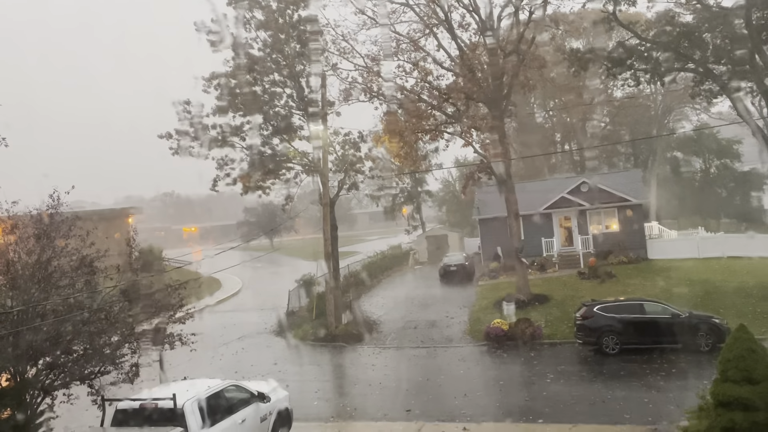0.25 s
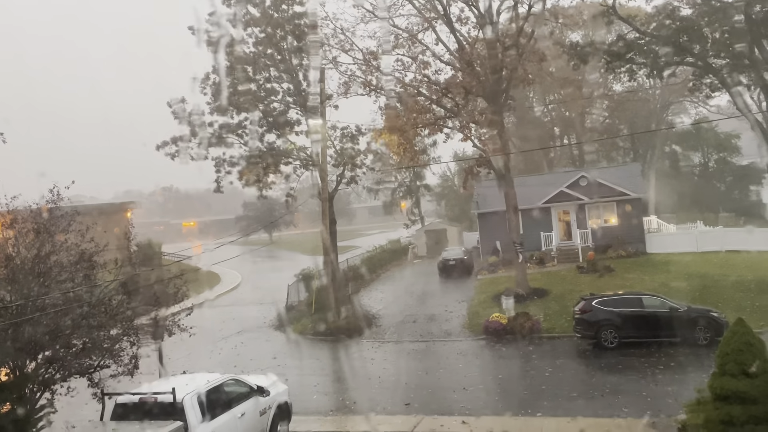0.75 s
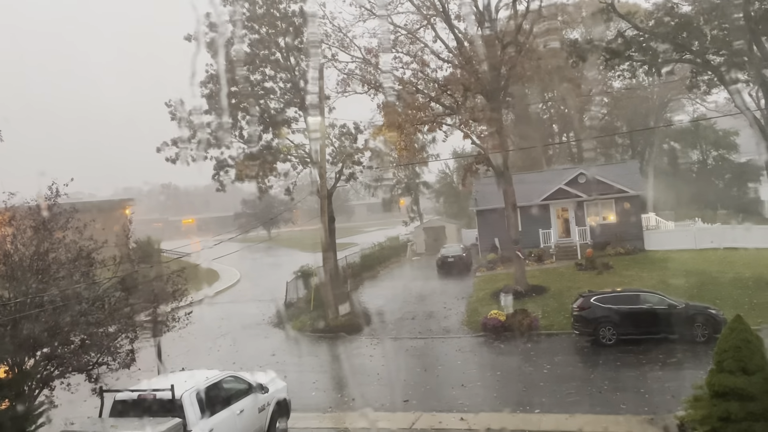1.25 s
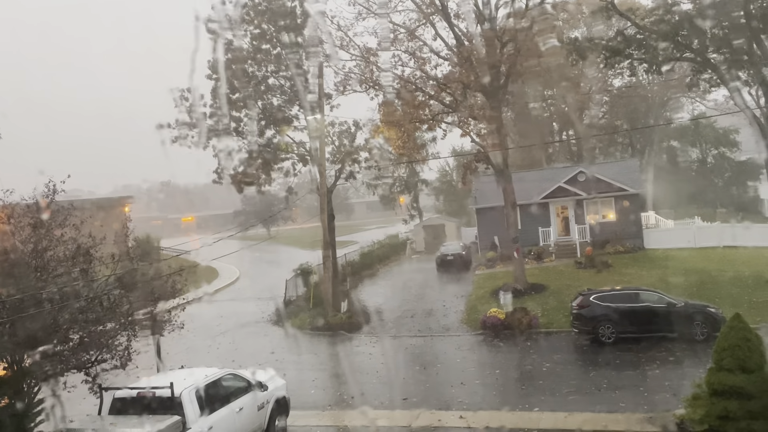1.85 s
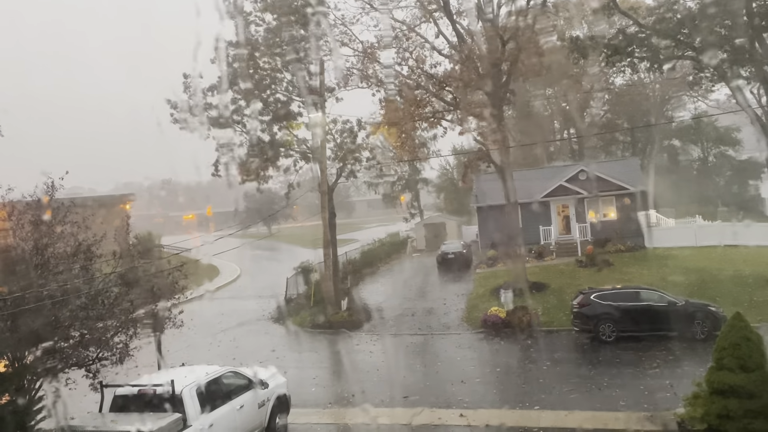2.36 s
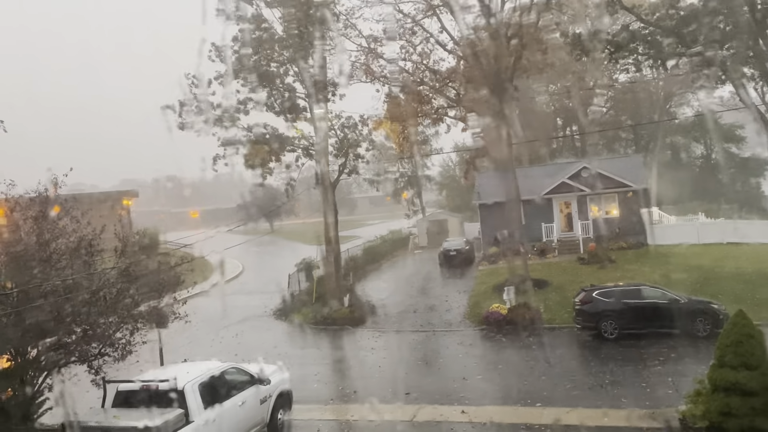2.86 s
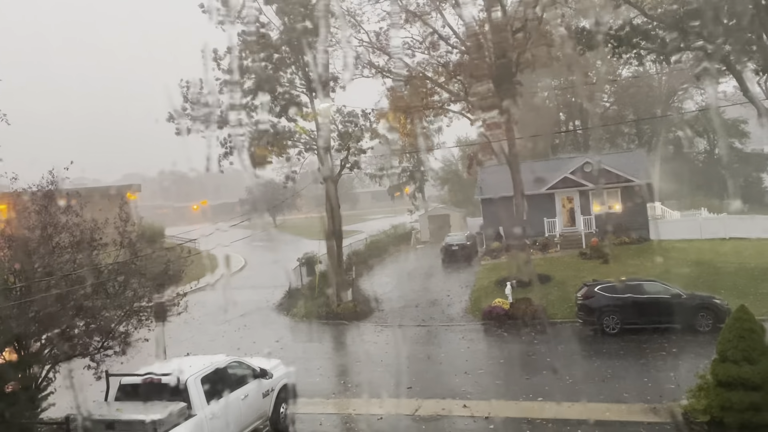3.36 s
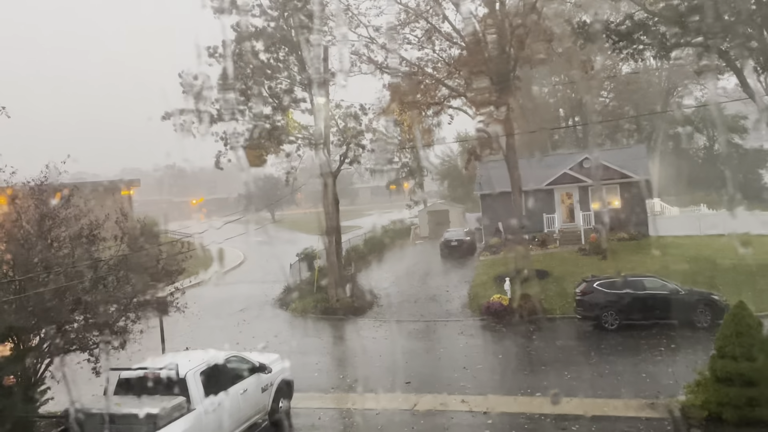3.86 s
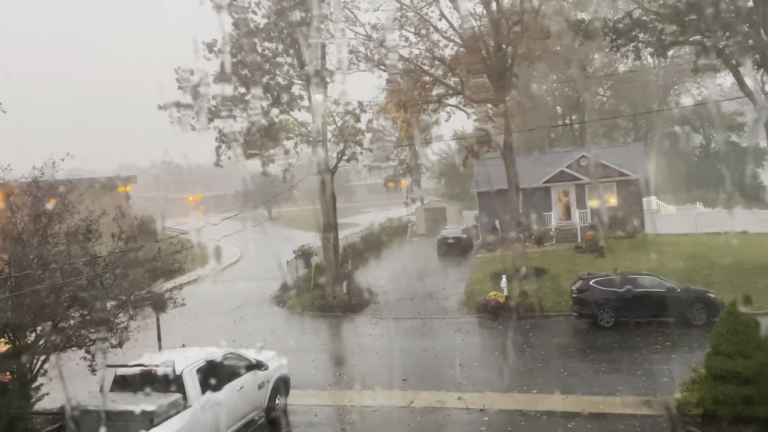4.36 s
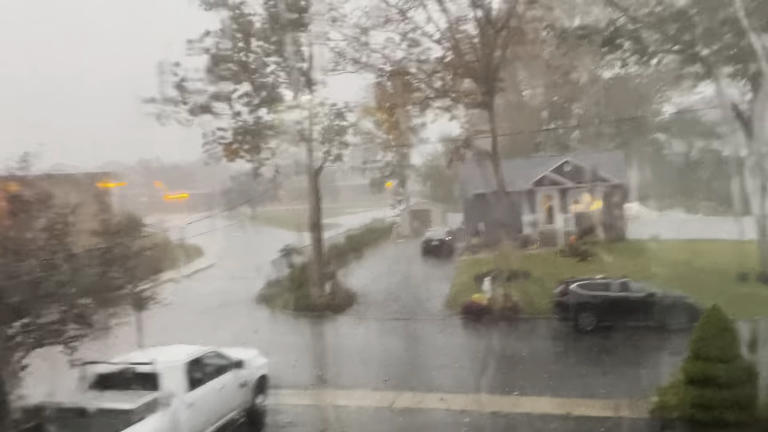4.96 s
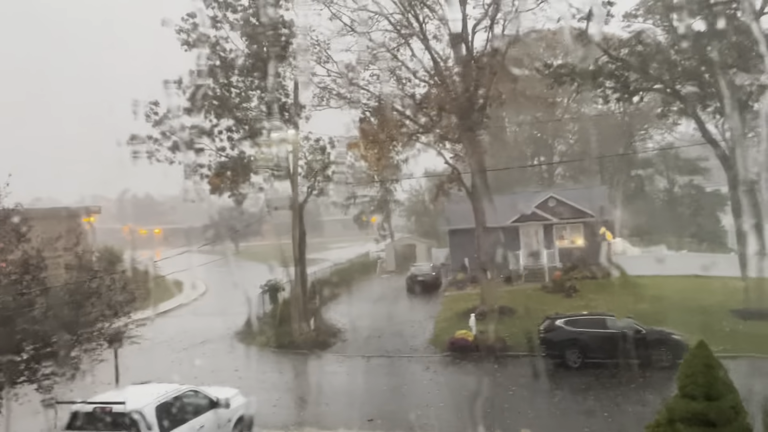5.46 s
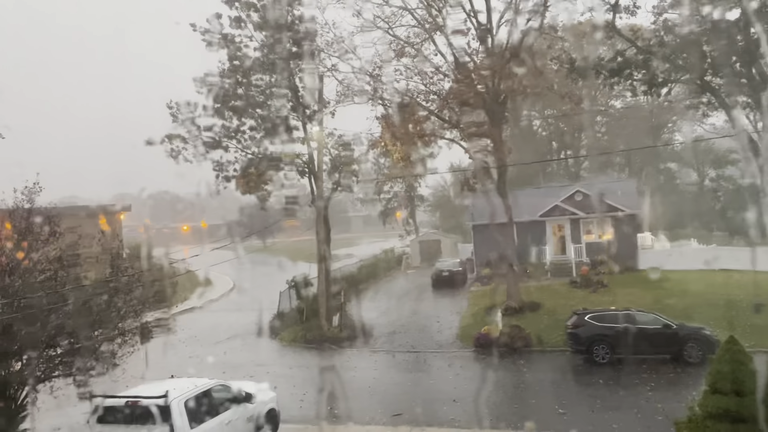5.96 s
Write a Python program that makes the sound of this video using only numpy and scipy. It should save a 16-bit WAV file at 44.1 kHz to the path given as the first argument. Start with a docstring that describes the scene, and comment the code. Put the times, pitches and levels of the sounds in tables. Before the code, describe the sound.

About six seconds of storm heard from inside a small furnished room, microphones close to a closed window. From the start there is a dull, muffled wash of rain, low drumming on roof and walls, and a deep uneven wind rumble. Fine patter and soft taps on sill and frame run throughout. Large drops strike the glass irregularly, with bright cracks around 0.5 s and the hardest at about 0.8-0.9 s, then a busy cluster at 1.05-1.4 s; each has a tick, small thud, short glassy ring and spatter. From 1.5 to 3 s hits are moderate and more scattered, then increasingly sparse and soft after 3.5 s. A low window hum swells around 1 s; a higher hum rises around 4.4-4.8 s. Wind bumps the pane faintly near 0.7, 1, 2.8 and 3.2 s, and strongly at 4.5-4.6 s. The end is mostly wind, thin patter and fading rain.

```python
"""Heavy drops, flung by gusts, hit a window close by: each one cracks, thuds, rings in the pane and spatters.
Light drops, fine spray and taps on the sill patter between them as the squall eases.
Behind them the downpour is a dull wash and a drumming on the roof; wind rumbles and makes the window hum.
Hits are short bursts of coloured noise, ringing is noise shaped by the pane's pitches, and rain and wind
are steady noise whose colour and changing strength come from tables."""
import sys
import numpy as np
from scipy import signal
from scipy.fft import rfft, irfft, next_fast_len
from scipy.io import wavfile
from scipy.ndimage import uniform_filter1d

SR = 44100
rng = np.random.default_rng(int(sys.argv[2]) if len(sys.argv) > 2 else 0)


def generate_wav(sig):
    """Save sig (samples, or channels by samples) to the path in sys.argv[1] as 16-bit PCM at SR."""
    pcm = np.round(np.clip(np.atleast_2d(sig).T, -1, 1) * 32767).astype(np.int16)
    wavfile.write(sys.argv[1], SR, pcm)


N = 273420  # length in samples

# Heavy drops on the glass: t/s, level/dB, thud against tick/dB, splash against tick/dB,
# ring of the struck spot f/Hz, pitch of the thud f/Hz; drop() trims the thud and splash further
HEAVY_DROPS = [(0.006, -52.5, 3.5, -10.5, 3940, 1100), (0.104, -60, 3, -5, 3780, 740),
               (0.324, -51, -1, -6.5, 2960, 600), (0.434, -49.5, -3, -6, 2200, 740),
               (0.465, -46, -4, -5, 2440, 1430), (0.4922, -34.5, -12, 0, 6300, 1100),
               (0.4973, -38.5, -11, -22, 3970, 1110), (0.528, -46.5, 5.5, -18, 3670, 860),
               (0.5849, -41, -16, -10, 3800, 680), (0.5926, -54, 8, -6, 3700, 710),
               (0.634, -64.0, 0.0, 5, 4310, 1040), (0.659, -55.5, 10.5, -11, 2330, 1174),
               (0.7268, -49.5, 4.0, -10.0, 3900, 830), (0.7534, -52, -2, -3, 2330, 670),
               (0.783, -35.0, -4.5, -7, 3470, 870), (0.802, -46.5, 3.5, -7, 5100, 784),
               (0.857, -30.5, -7.5, -4, 5900, 1140), (0.8614, -35.5, -12, -21, 3800, 1440),
               (0.867, -41, -11, -20, 3600, 1440), (0.9877, -54, -2, -8, 3700, 820),
               (1.052, -42, -20, -13, 5040, 690), (1.0783, -42, -6, -8.0, 2420, 1200),
               (1.1211, -44.0, -4, -9, 3500, 880), (1.139, -37, 4, -10, 2240, 1100),
               (1.146, -44, 5.5, -9, 2300, 1140), (1.1556, -44.5, -1, -8.0, 3480, 786),
               (1.169, -46, 4, -2, 3890, 750), (1.198, -50.0, 4, -10, 2400, 840),
               (1.2999, -55, -1, -10, 3700, 1230), (1.3207, -46, -11.0, -6.0, 2300, 760),
               (1.3603, -41.5, -11, -7, 3780, 750), (1.3734, -47.5, -18.0, -1.5, 3770, 1170),
               (1.404, -55.5, -8.0, 3.0, 2520, 740), (1.4903, -43.5, -18.0, 0.5, 3850, 600),
               (1.579, -45, -3, -7.0, 3800, 850), (1.6149, -61, -13, 1, 3590, 740),
               (1.688, -64.5, 13, 6, 2350, 880), (1.7302, -50.5, -0.5, -1, 3750, 780),
               (1.7627, -51.5, -8.0, -8.0, 3740, 780), (1.812, -50, 5.5, -2, 2210, 645),
               (1.881, -52.5, -6, -3, 4370, 780), (1.905, -55, -1, -15, 2400, 870),
               (1.923, -43.5, -4.5, -13, 3740, 830), (2.02, -51.5, 4, -15.0, 2100, 1440),
               (2.0564, -61, 7.5, -10, 2120, 880), (2.0937, -42.0, -12, -2, 3800, 990),
               (2.155, -65, -9.0, 10, 2200, 1440), (2.218, -45.5, -15.0, 0.5, 3840, 760),
               (2.339, -54, 3, 7, 4820, 1060), (2.3505, -42, 4.5, -7, 4100, 1110),
               (2.405, -46, -8, -7, 3900, 1090), (2.4232, -39.0, -9.0, -19, 3880, 1010),
               (2.428, -45, -4, -27, 4500, 870), (2.513, -46.5, -5, -5, 3800, 750),
               (2.562, -49, -4, -16.0, 2590, 1170), (2.661, -58.5, 9, -4.5, 2100, 985),
               (2.711, -40, -15, -20, 2530, 1300), (2.7189, -43, -6, -21, 2400, 1290),
               (2.869, -49, 5, -5.5, 3620, 820), (2.9161, -52.0, 4, -7, 2270, 1130),
               (2.919, -44.0, 5, 0, 2260, 1160), (2.961, -49.5, -21.0, -8.0, 3700, 760),
               (3.02, -56.5, -4.0, -4.0, 2540, 600), (3.072, -47.5, -3, -4.5, 5400, 1080),
               (3.292, -53, -12, -33, 2460, 1390), (3.357, -53.5, -2.0, -8, 2290, 820),
               (3.41, -44.5, -12.0, -9, 3460, 1070), (3.5252, -47.5, -6.0, 3.5, 5650, 816),
               (3.705, -54.5, -2, -10.0, 3930, 780), (3.9505, -55.0, 4.5, 1.5, 2290, 780),
               (3.9714, -46, 2.5, -2.5, 2150, 1160), (4.0525, -48.5, -0.5, -5.5, 4040, 1090),
               (4.121, -60.0, -4.0, -6.0, 2310, 730), (4.22, -56.0, 2.5, -26.0, 2480, 1010),
               (4.3508, -62, -19, -3, 2520, 600), (4.374, -58.0, -16.0, -2.0, 2900, 760),
               (4.443, -54.5, -19, -0.5, 2260, 600), (4.638, -58.0, 3, -21, 2200, 790),
               (4.712, -52.5, -6, -10, 3670, 1240), (4.861, -51, 3, -32, 3870, 1260),
               (5.058, -68, 13, -18, 2300, 790), (5.562, -56.5, 1, -16, 2800, 700)]
# Wind slapping the window: t/s, peak level of the ring/dB
WIND_SLAPS = [(0.717, -39), (0.966, -41), (2.79, -48), (3.245, -41), (4.513, -34.5), (4.587, -28)]
# Wind in two long gusts, the first in the lower hum, the second in the upper; levels before trim and wavering:
# t/s, rumble level/dB, lower hum level/dB, upper hum level/dB
WIND_STRENGTH = [(0, -41.5, -45, -54), (0.4, -45, -41, -50), (1.15, -43.5, -39, -47.5),
                 (1.6, -45, -44.5, -49.5), (2.1, -48.5, -54, -56), (2.45, -47.5, -52.5, -55),
                 (2.8, -43.5, -42, -51), (3.0, -47, -52.5, -49.5), (3.3, -41.5, -47.5, -49),
                 (3.75, -45, -51.5, -52), (4.05, -43.5, -44, -45.5), (4.4, -45, -53, -42),
                 (4.75, -46.5, -53, -43), (5.25, -43.5, -44, -49), (5.7, -47, -49, -52.5),
                 (6.2, -46.5, -47.5, -58.5)]
# Rain strength, one squall that slowly eases: t/s, level/dB (the wash is trimmed from this)
RAIN_STRENGTH = [(0.0, -51.5), (0.4, -53.5), (0.7, -51.5), (0.88, -47.5), (1.2, -49), (1.97, -52),
                 (2.17, -56.5), (2.62, -53), (3.66, -55.5), (4.54, -55), (5.01, -56.5), (5.44, -55),
                 (6.2, -58.5)]
# Pitches at which the pane bends and rings: f/Hz, level/dB (before each drop's own balance)
PANE_MODES = [(728, 0), (865, -2), (1068, 0), (1180, -1), (1594, -4), (2330, -4), (2440, 0), (2560, -3),
              (2804, -4), (3340, -4), (3638, -1), (3775, 0), (4010, -4), (4230, -3), (4487, 0), (4721, -2),
              (4867, -2), (5145, -3), (5620, -4), (6600, 0)]
# Low resonances of the room: f/Hz, width f/Hz, level/dB
ROOM_BOOM = [(70, 40, 4), (186, 18, 7.5), (198, 38, -3), (324.2, 10.3, 7)]
# Window resonances that hum in the gusts, lower and upper group: f/Hz, width f/Hz, level/dB
LOWER_WINDOW_HUMS = [(143.9, 21.7, 0)]
UPPER_WINDOW_HUMS = [(227.3, 12, 0), (307.3, 11.3, -6), (390.4, 13, -17), (446.6, 8.8, -19)]

# Sound colours, of which only the shape counts: f/Hz, level/dB
# wind rumble
RUMBLE_COLOUR = [(12, -29), (25, -16), (40, -12), (60, -3), (100, -3.5), (160, -3.5), (250, -8),
                 (330, -12.5), (460, -20.5), (600, -31), (1000, -35), (3000, -71.5)]
# rain outside, dulled by the window
WASH_COLOUR = [(250, -18), (450, 4.5), (600, 4.5), (780, 4.5), (1100, -2), (1500, -5.5), (2400, -6),
               (3600, -9.5), (5500, -15.5), (7200, -19), (10000, -21.5), (13000, -37), (15000, -47),
               (16000, -55)]
# rain drumming on the roof and walls
DRUM_COLOUR = [(200, -26.5), (330, -0.5), (390, -1), (490, 0), (570, -16), (900, -32.5), (2000, -56.5)]
# fine drops on the glass
PATTER_COLOUR = [(500, -19), (1500, -5.5), (2500, 0), (3900, -1), (5200, -11.5), (7800, -27), (9200, -25),
                 (10000, -32), (12500, -28), (14000, -25), (15000, -40), (16200, -46)]
# soft drops on sill and frame
TAP_COLOUR = [(300, -8), (700, 1.5), (1300, -0.5), (2500, -5.5), (4500, -9.5), (8000, -28)]
# the three parts of a drop's blow
THUD_COLOUR = [(250, -29), (500, -4.5), (750, 7), (1150, 3), (1700, -2.5), (2300, -2.5), (4000, -59.5)]
TICK_COLOUR = [(900, -2.5), (1600, 0.5), (2200, 6), (3900, 5.5), (5200, 4), (6700, -5), (7800, -3.5),
               (9000, -13), (11000, -49)]
SPLASH_COLOUR = [(4000, -58), (6500, 4), (7900, 3.5), (9200, 2.5), (10000, 0), (12500, -7.5), (14000, -1.5),
                 (15500, -8), (16300, -17)]

# Stereo width, the difference between the ears against what they share: f/Hz, level/dB
STEREO_WIDTH = [(50, -18.5), (125, -18), (250, -12), (500, -3.5), (1000, -3.5), (2000, -1.5), (4000, -7),
                (5500, -4.5), (8000, -19), (14000, -19)]
# How far the left microphone lags the right: f/Hz, phase/radians
LEFT_LAG = [(0, 0), (5800, 0), (6600, .9), (7750, 2.8), (8400, 3.3), (11000, 6.2), (12200, 6.4),
            (14700, 9.4), (16500, 9.4)]

USUAL_RAIN_DB = -55  # rain strength at which the patter and drumming have their plain levels


def undb(db):
    """Turn decibels into a gain."""
    return 10 ** (np.asarray(db) / 20)


def curve(table, column):
    """Join one column of a table of times with straight lines."""
    rows = np.array(table)
    return np.interp(np.arange(N) / SR, rows[:, 0], rows[:, column])


def unit(x):
    """Scale to an average (rms) level of 1, taken on the mean of the channels."""
    return x / np.sqrt(np.mean(np.atleast_2d(x).mean(0) ** 2))


def colour(x, points, peaks=()):
    """Filter by a smooth spectrum plus resonance peaks, without sounding ahead of the input."""
    size = next_fast_len(x.shape[-1] // 2 + 1024) * 2
    hz = np.maximum(np.fft.rfftfreq(size, 1 / SR), 1)
    points = np.array(points)
    db = np.interp(np.log(hz), np.log(points[:, 0]), points[:, 1])
    for centre, width, gain in peaks:
        db = db + gain / (1 + (2 * (hz - centre) / width) ** 2)
    # folding the cepstrum gives the phase that puts the energy as early as possible
    cepstrum = irfft(np.log(undb(db)))
    cepstrum[1:size // 2] *= 2
    cepstrum[size // 2 + 1:] = 0
    response = np.exp(rfft(cepstrum))
    return irfft(rfft(x, size) * response)[..., :x.shape[-1]]


def spread(pair):
    """Make stereo from two unrelated signals: alike in the bass, less alike higher up."""
    side = colour(pair[1], STEREO_WIDTH)
    return np.array([pair[0] + side, pair[0] - side])


def air(size):
    """White noise that comes from all around."""
    return spread(rng.standard_normal((2, size)))


def pan(x, left_db):
    """Lean a pair of channels to the left."""
    return x * undb(np.array([[left_db], [-left_db]]) / 2)


def walk(rate):
    """Slow random wavering of size 1, from random steps (rate in steps per second) smoothed twice."""
    k = int(SR / rate)
    steps = np.repeat(rng.standard_normal(N // k + 1), k)
    smooth = uniform_filter1d(uniform_filter1d(steps, k), k)
    return unit(smooth[:N])


def fade(t, t60):
    """Die away steadily, by 60 dB in t60 seconds."""
    return np.exp(-np.log(1000) * t / t60)


def add(out, sound, at):
    """Mix a sound in at a time in seconds."""
    i = max(int(at * SR), 0)
    out[:, i:i + sound.shape[1]] += sound[:, :max(out.shape[1] - i, 0)]


def impact(spectrum, t60, build_s, crack, crack_t60, peaks=(), ragged_db=-2.5):
    """A sharp first wave, then edge reflections and flung droplets as noise that builds up and fades."""
    t = np.arange(4096) / SR
    bumps = np.interp(t, np.linspace(0, t[-1], num=36), rng.standard_normal(size=36))
    build_up = fade(t, t60) * (1 - np.exp(-t / build_s)) * undb(ragged_db * bumps)
    envelope = build_up + crack * fade(t, crack_t60)
    noise = rng.standard_normal((2, len(t))) * envelope
    pair = colour(spread(noise), spectrum, peaks)
    head = int(.014 * SR)  # the first 14 ms get an rms level of 1
    return pair / np.sqrt(np.mean(pair[:, :head].mean(0) ** 2))


def downpour(wash_db=-1.46, waver_db=-0.42, drum_db=-3.5, drum_growth=1.13, drum_waver_db=1.65):
    """Rain on the street, dulled by the closed window, and its low drumming on roof and walls."""
    rain = curve(RAIN_STRENGTH, column=1)
    wash = unit(colour(air(N), WASH_COLOUR))
    wash = wash * undb(rain + wash_db + waver_db * walk(12))
    # drum_growth is how many dB the drumming gains per dB of rain
    drum_level = USUAL_RAIN_DB + drum_db + drum_growth * (rain - USUAL_RAIN_DB)
    drum_level = drum_level + drum_waver_db * walk(9.6)
    drumming = unit(colour(air(N), DRUM_COLOUR)) * undb(drum_level)
    return wash + pan(drumming, left_db=2.0)


def wind(rumble_db=1, gusty_db=1.0, eddy_db=1.23, hum_waver_db=2.0):
    """Turbulence rumbles through the walls and hums in the window; deep and higher eddies swell on their own."""
    rumble = unit(colour(air(N), RUMBLE_COLOUR, ROOM_BOOM))
    lowpass = signal.butter(3, 120, fs=SR, output="sos")
    deep = signal.sosfiltfilt(lowpass, rumble)
    eddies = sum(part * undb(eddy_db * walk(7)) for part in (deep, rumble - deep))
    out = eddies * undb(curve(WIND_STRENGTH, column=1) + rumble_db + gusty_db * walk(9))
    push = colour(air(N), RUMBLE_COLOUR)
    for column, hums in ((2, LOWER_WINDOW_HUMS), (3, UPPER_WINDOW_HUMS)):
        gust = curve(WIND_STRENGTH, column)
        for hz, width_hz, db in hums:
            hum = signal.lfilter(*signal.iirpeak(hz, hz / width_hz, fs=SR), push)
            out += unit(hum) * undb(gust + db + hum_waver_db * walk(7.6))
    return pan(out, left_db=0.7)


def buffets(ring_t60=0.3, ring_hz=226, rise_t60=0.036, thump_db=-7, thump_t60=0.96):
    """A slap of wind bumps the window: a low ring and a short swell of rumble."""
    out = np.zeros((2, N))
    t = np.arange(SR // 2) / SR
    push = 1 - fade(t, rise_t60)
    ring = np.sin(2 * np.pi * ring_hz * t) * fade(t, ring_t60) * push
    ring = ring / ring.max()
    for at, db in WIND_SLAPS:
        rumble = unit(colour(air(len(t)), RUMBLE_COLOUR, [(600, 650, -5)]))
        thump = rumble * fade(t, thump_t60) * push
        add(out, undb(db) * (ring + undb(thump_db) * thump), at)
    return out


def sill_taps(count=130, below_rain_db=5.5, scatter_db=3, tap_t60=0.05, spot_db=11):
    """Soft drops on sill and frame, each at one of 14 dull pitches; they thin out as the rain eases."""
    out = np.zeros((2, N))
    rain = curve(RAIN_STRENGTH, column=1)
    spots = [impact(TAP_COLOUR, t60=tap_t60, build_s=0.0014, crack=0.46, crack_t60=0.0076,
                    peaks=[(hz, hz / 5, spot_db)])
             for hz in np.geomspace(700, 4200, num=14)]
    # stronger rain takes a larger share of the taps
    fallen = np.cumsum(undb(rain))
    for when, size, spot, lean in rng.random(size=(count, 4)):
        i = np.searchsorted(fallen, when * fallen[-1])
        db = rain[i] - below_rain_db + scatter_db * (min(-np.log(size), 2) - 1)
        tap = pan(spots[int(spot * len(spots))], left_db=10 * (lean - .5))
        add(out, tap * undb(db), i / SR)
    return out


def patter(per_s=130, scatter_db=5, patter_db=-65, growth=0.46):
    """Fine drops of very uneven size, each smeared by the pane and coloured by the spot it hits."""
    hit = rng.random(N) < per_s / SR
    size = undb(scatter_db * np.minimum(rng.exponential(size=N), 3))
    spots = rng.integers(0, 16, N)
    out = np.zeros((2, N))
    for spot, spot_hz in enumerate(np.geomspace(900, 6500, num=16)):
        ring = impact(PATTER_COLOUR, t60=.09, build_s=.0016, crack=0.94, crack_t60=0.0057,
                      peaks=[(spot_hz, spot_hz / 4, 8)])
        for i in np.flatnonzero(hit & (spots == spot)):
            add(out, size[i] * ring, i / SR)
    # growth is how many dB the patter gains per dB of rain
    level = patter_db + growth * (curve(RAIN_STRENGTH, column=1) - USUAL_RAIN_DB)
    return pan(unit(out), left_db=4.5) * undb(level)


def pane_ring(ring_hz, thud_rel, low_modes_db=2, uneven_db=4, spot_octaves=.25, far_modes_db=-5,
              pane_q=70, pane_t60=0.11):
    """The pane rings on in narrow, beating bands: a spot favours pitches near its own, low ones follow the thud."""
    size = 8192
    mode_hz, mode_db = np.transpose(PANE_MODES)
    near_spot = np.exp(-(np.log2(mode_hz / ring_hz) / spot_octaves) ** 2)
    low_share = undb(thud_rel + low_modes_db)
    high_share = near_spot + undb(far_modes_db)
    share = undb(mode_db) * np.where(mode_hz < 2000, low_share, high_share)
    share = share * undb(uneven_db * (2 * rng.random(len(mode_hz)) - 0.5))
    # each pitch becomes a narrow band of noise; a higher pane_q makes it narrower
    detuning = 2 * pane_q * (np.fft.rfftfreq(size, 1 / SR) / mode_hz[:, None] - 1)
    response = np.sqrt((share ** 2 / mode_hz) @ (1 / (1 + detuning ** 2)))
    ring = irfft(rfft(rng.standard_normal((2, size))) * response)
    strength = np.sqrt(np.sum(share ** 2) / 2)
    ring = unit(spread(ring)) * strength * fade(np.arange(size) / SR, pane_t60)
    return pan(ring, left_db=3)


def spatter(tint, count=13, mean_delay_s=.032, landing_t60=.016):
    """Droplets flung off by a drop land again in a short, uneven cluster of noise bursts."""
    t = np.arange(SR // 8) / SR
    landings = np.zeros(len(t))
    for delay, size in rng.exponential(size=(count, 2)):
        landings[int(delay * mean_delay_s * SR) % len(t)] += min(size, 2) ** 2
    # each landing adds energy that dies away
    energy = signal.lfilter([1], [1, -fade(1 / SR, landing_t60) ** 2], landings)
    noise = rng.standard_normal((2, len(t))) * np.sqrt(energy)
    return unit(colour(spread(noise), TICK_COLOUR, tint))


def drop(db, thud_rel, splash_rel, ring_hz, thud_hz, thud_db=-1, splash_db=-1, spatter_db=-19,
         spot_db=4, blunt_spot_db=5.5, spot_q=6, dulling_db=7, ring_db=-16.5, blunt_ring_db=1.5):
    """One drop: a splash, a tick and thud that spread through the glass, a ringing pane and droplets landing again."""
    # a drop with little splash lands bluntly: its tick is duller, builds up more slowly and rings more
    bluntness = np.clip(-splash_rel / 12, .2, 2)
    tint = [(ring_hz, ring_hz / spot_q, spot_db + blunt_spot_db * bluntness),
            (7500, 3500, dulling_db * (1 - bluntness))]
    tick = impact(TICK_COLOUR, t60=0.053, build_s=.004 * bluntness, crack=1.0 / (1 + bluntness),
                  crack_t60=0.032, peaks=tint)
    thud = impact(THUD_COLOUR, t60=0.068, build_s=0.00049, crack=0.29, crack_t60=0.0082,
                  peaks=[(thud_hz, 300, 4.5)])
    splash = impact(SPLASH_COLOUR, t60=0.094, build_s=0.00076, crack=5.6, crack_t60=0.013)
    bright = pan(tick, left_db=2.5) + splash * undb(splash_rel + splash_db)
    out = pane_ring(ring_hz, thud_rel) * undb(ring_db + blunt_ring_db * bluntness)
    add(out, bright + thud * undb(thud_rel + thud_db), 0)
    add(out, spatter(tint) * undb(spatter_db), 0)
    return out * undb(db)


def light_drops(count=20, below_rain_db=8, scatter_db=3.0, thud_db=1, splash_db=-11, variety_db=3):
    """Smaller drops hit the pane at random pitches, more often and harder when the rain is strong."""
    out = np.zeros((2, N))
    rain = curve(RAIN_STRENGTH, column=1)
    fallen = np.cumsum(undb(rain) ** 2)
    # one drop falls in each equal share of the rain's energy
    shares = (np.arange(count) + rng.random(count)) / count
    for i in np.searchsorted(fallen, fallen[-1] * shares):
        size, thud, splash = rng.standard_normal(size=3)
        db = rain[i] - below_rain_db + scatter_db * size
        thud_rel = thud_db + variety_db * thud
        splash_rel = splash_db + variety_db * splash
        ring_hz, thud_hz = rng.uniform(2200, 4600), rng.uniform(620, 1200)
        add(out, drop(db, thud_rel, splash_rel, ring_hz, thud_hz), i / SR)
    return out


def heavy_drops():
    """The big drops that gusts fling at the glass, each at its own time."""
    out = np.zeros((2, N))
    for at, db, thud_rel, splash_rel, ring_hz, thud_hz in HEAVY_DROPS:
        add(out, drop(db, thud_rel, splash_rel, ring_hz, thud_hz), at)
    return out


def room(x, room_db=-9.5, low_t60=0.28, high_t60=0.25, build_s=0.011, dull_hz=7500):
    """A small furnished room carries each blow on, duller than it came, as a fading tail of noise."""
    t = np.arange(SR // 2) / SR
    lowpass = signal.butter(2, 2000, fs=SR)
    bandpass = signal.butter(2, [2000, min(dull_hz, 16000)], "band", fs=SR)
    low = signal.lfilter(*lowpass, air(len(t))) * fade(t, low_t60)
    high = signal.lfilter(*bandpass, air(len(t))) * fade(t, high_t60)
    tail = (low + high) * np.minimum(t / build_s, 1) ** 2
    # scaled by the band it fills, so that room_db is its share within that band
    tail = tail * np.sqrt(2 * dull_hz / SR / np.sum(tail.mean(0) ** 2))
    return x + undb(room_db) * signal.oaconvolve(x, tail, axes=1)[:, :N]


def scene():
    """Drops on the glass, carried on by the room, in front of the storm."""
    storm = downpour() + wind() + buffets()
    drops = heavy_drops() + light_drops() + patter() + sill_taps()
    return storm + room(drops)


def record(dry):
    """The left microphone hears the treble a little later than the right; the recorder cuts the top."""
    size = next_fast_len(N + 1024)
    lag = np.interp(np.fft.rfftfreq(size, 1 / SR), *np.transpose(LEFT_LAG))
    left = irfft(rfft(dry[0], size) * np.exp(-1j * lag), size)[:N]
    top_cut = signal.ellip(8, .2, 70, 16400, fs=SR, output="sos")  # cuts above 16400 Hz
    return signal.sosfilt(top_cut, np.array([left, dry[1]]))


dry = scene()
out = record(dry)
generate_wav(out)
```